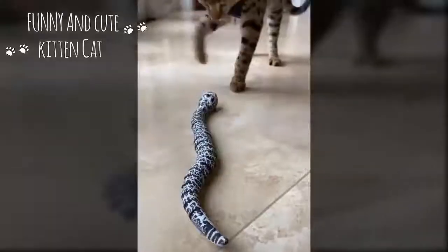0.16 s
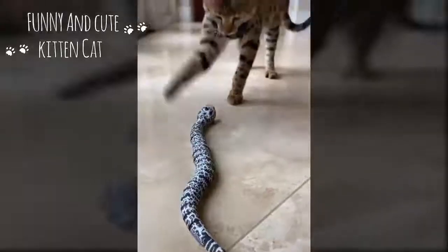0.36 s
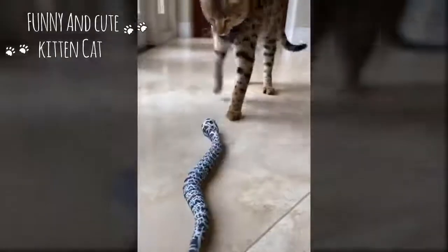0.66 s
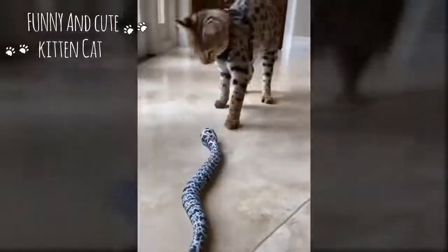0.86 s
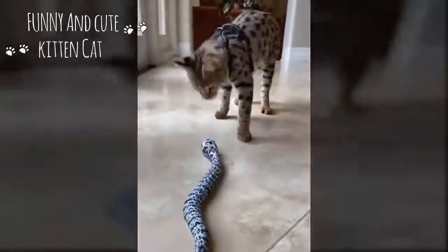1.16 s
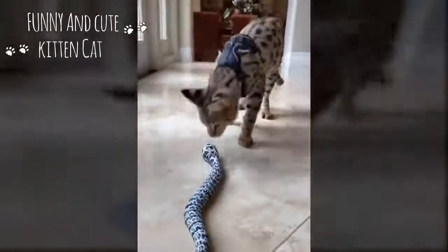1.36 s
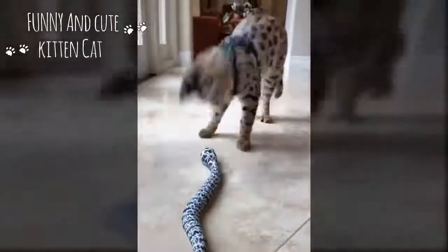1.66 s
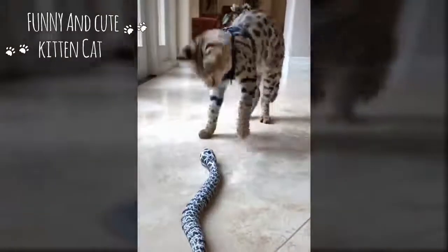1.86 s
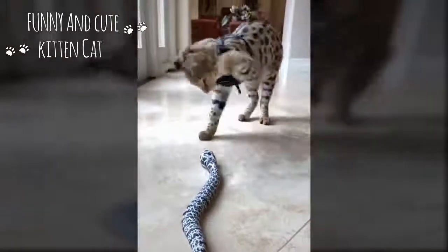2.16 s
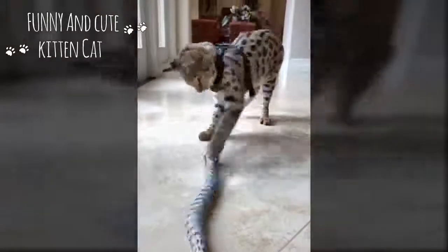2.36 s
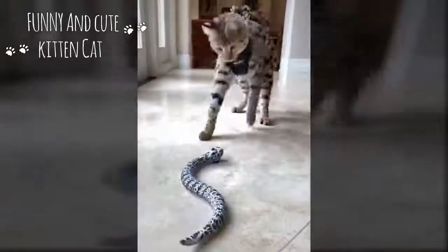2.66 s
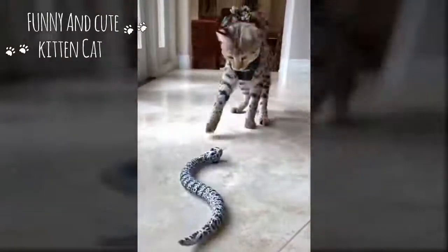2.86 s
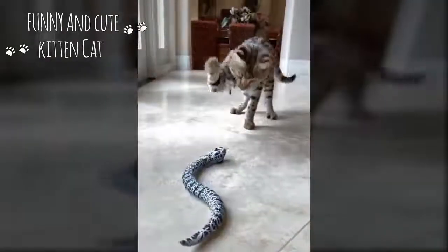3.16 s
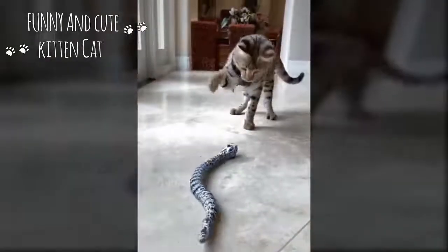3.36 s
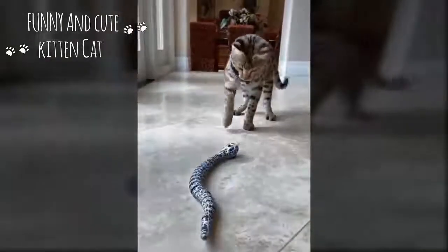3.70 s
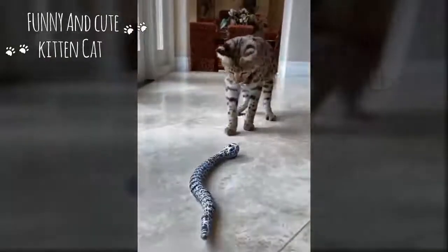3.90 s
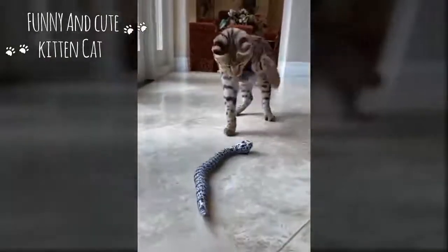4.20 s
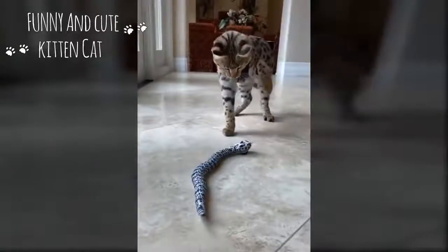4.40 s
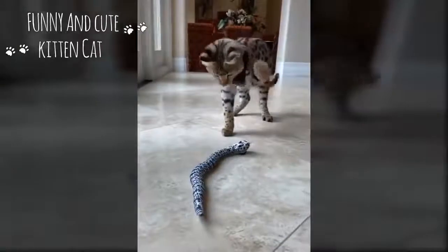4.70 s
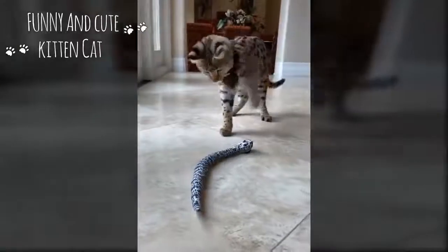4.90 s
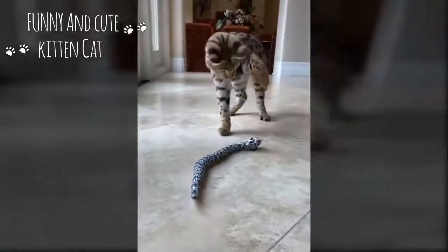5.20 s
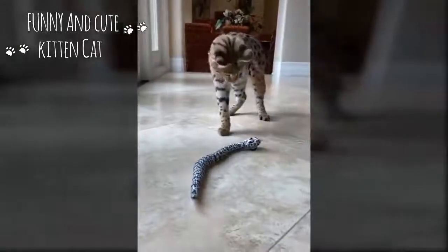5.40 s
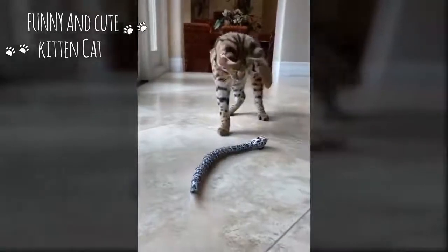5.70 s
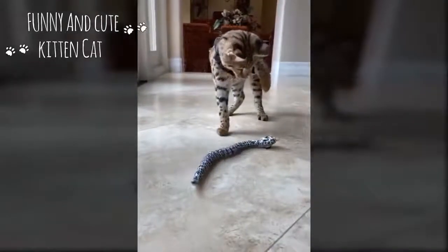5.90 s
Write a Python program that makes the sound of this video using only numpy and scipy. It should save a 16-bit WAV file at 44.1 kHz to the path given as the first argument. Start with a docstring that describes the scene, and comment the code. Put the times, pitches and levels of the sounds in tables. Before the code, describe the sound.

A faint hum runs under a live, stone-floored room. At about 0.4 seconds a toy snake whips sideways on the tile, a short hissing rasp with a soft low thump, followed by a remote button springing back. Light, close plastic taps and faint rubs are scattered from 0.6 to 1.8 seconds. A button clicks at 2.2, and a longer, louder rasp follows at 2.3, ending in a sharp plastic clack.

Then the toy makes four runs of about a quarter second each, at 3.0, 3.8, 4.7 and 5.5 seconds. In each, a small motor whirrs high while plastic segments rattle, knock and scrape. A crisp button click comes just before each run, and a release click during or after it. A brief scuff sounds at 5.1, and a soft rub with light taps near 6. The remote is close and almost dry, the snake farther off with room echo.

```python
"""Toy snake on a stone floor

A remote-controlled toy snake wriggles in front of a cat, far enough off the microphone to fill a live
room. Each move is a short hissing rasp: a small motor whirrs, plastic segments rattle and scrape on tile.
Close up and almost dry, the remote's buttons click down and spring back, among light taps on plastic.
The room hums faintly underneath."""
import sys
import numpy as np
from scipy import signal
from scipy.fft import rfft, irfft
from scipy.io import wavfile
from scipy.ndimage import map_coordinates

SR = 44100
rng = np.random.default_rng(int(sys.argv[2]) if len(sys.argv) > 2 else 0)


def log_audio(samples):
    """Write samples as a 16-bit WAV file to the path given in sys.argv[1]."""
    # one column per channel
    frames = np.atleast_2d(samples).T
    # limit to full scale, then quantise
    limited = np.clip(frames, -1, 1)
    pcm = np.round(limited * 32767).astype(np.int16)
    wavfile.write(sys.argv[1], SR, pcm)


N = 266805
TIME = np.arange(N) / SR
BRIEF = TIME[:2048]

# forward runs, levels relative: t/s, length/s, slack/s, rattle/dB, rattle fade/(dB/s), motor/dB, lurch/dB
RUNS = [(3.035, 0.29, 0.068, -33.5, 52, -35.5, -55), (3.813, 0.25, 0.053, -40.5, -9, -35.5, -35.5),
        (4.698, 0.268, 0.058, -34, 81, -36, -35), (5.467, 0.28, 0.12, -35, 56, -35, -40.5)]


def from_db(db):
    """Decibels to amplitude."""
    return 10 ** (np.asarray(db) / 20)


def rms_one(x):
    """Scales to unit rms."""
    return x / np.sqrt(np.mean(x ** 2) + 1e-20)


def peak_one(x):
    """Scales to unit peak."""
    return x / np.max(np.abs(x))


def energy_one(x):
    """Scales to unit energy."""
    return x / np.linalg.norm(x)


def at_hz(points, hz):
    """Reads a table on a log-frequency axis."""
    known_hz, values = np.transpose(points)
    return np.interp(np.log(np.maximum(hz, 1)), np.log(known_hz), values)


def response(spectrum, size=2048):
    """Minimum-phase impulse response of a spectrum."""
    cepstrum = irfft(np.log(from_db(at_hz(spectrum, np.fft.rfftfreq(size, 1 / SR)))))
    cepstrum[1:size // 2] *= 2
    cepstrum[size // 2 + 1:] = 0
    return energy_one(irfft(np.exp(rfft(cepstrum))))


def through(x, pulse):
    """Passes a signal through an impulse response."""
    return signal.fftconvolve(x, pulse)[:len(x)]


def filtered(x, kind, hz):
    """A gentle Butterworth filter."""
    return signal.sosfilt(signal.butter(2, hz, kind, fs=SR, output="sos"), x)


def ringing(modes):
    """Impulse response of parallel resonances."""
    return energy_one(sum(from_db(db) * width * np.exp(-np.pi * width * BRIEF)
                          * np.cos(2 * np.pi * hz * BRIEF) for hz, width, db in modes))


def add(track, s, sound):
    """Lays a sound into a track at s seconds."""
    start = round(s * SR)
    track[start:start + len(sound)] += sound[:N - start]


def envelope(start, length, attack_s, release_s):
    """Straight attack, hold, exponential release."""
    t = TIME - start
    return np.clip(t / attack_s, 0, 1) * np.exp(-np.maximum(t - length, 0) / release_s)


def crack(decay_s):
    """A contact that breaks up into ever weaker micro-impacts."""
    return rng.standard_normal(len(BRIEF)) * np.exp(-BRIEF / decay_s)


def rattle(per_s, spread_db, decay_s, scrape_db):
    """Random tiny collisions of uneven size over a smooth scrape."""
    sizes = from_db(spread_db * np.minimum(rng.exponential(1, N), 3))
    hits = rng.random(N) < per_s / SR
    power = signal.lfilter([1], [1, -np.exp(-2 / (decay_s * SR))], hits * sizes ** 2 + 1e-18)
    amplitude = np.sqrt(power / power.mean() + from_db(scrape_db) ** 2)
    return rms_one(amplitude * rng.standard_normal(N))


def room(x, wet_db, wall_cut_hz, first_echo_s=0.005, size=32768):
    """Direct sound plus a diffuse tail off stone and plaster; the treble dies first."""
    # reverberation time: f/Hz, t60/s
    t60 = [(200, 1), (2500, 0.63), (5000, 0.55), (9000, 0.46), (13000, 0.46)]
    t, tail = TIME[:size], 0
    edges = np.geomspace(100, 16000, num=40)
    hz = np.fft.rfftfreq(size, 1 / SR)
    dulled = rfft(rng.standard_normal(size)) / np.sqrt(1 + (hz / wall_cut_hz) ** 4)
    for low, high in zip(edges, edges[1:]):
        band = irfft(dulled * (hz >= low) * (hz < high))
        tail += band * np.exp(-np.log(1000) * t / at_hz(t60, np.sqrt(low * high)))
    return x + from_db(wet_db) * through(x, energy_one(tail * (t > first_echo_s)))


def room_tone(hum_hz=249.3):
    """Low room noise with a faint appliance hum."""
    # spectrum of the quiet room: f/Hz, level/dB
    air_colour = [(15, -31.5), (25, -28), (53, 3.5), (137, -6), (173, -9), (244, -11), (285, -11.5),
                  (333, -11.5), (658, -19), (731, -17), (975, -19.5), (1980, -22.5), (2370, -23.5),
                  (3250, -25.5), (13000, -39.5)]
    air = through(rng.standard_normal(N), response(air_colour, size=8192))
    hum = np.sqrt(2) * np.sin(2 * np.pi * hum_hz * TIME)
    return from_db(-63.5) * air + from_db(-76.5) * hum


def snake_flicks():
    """The body whips sideways: a dense rasp, with slams as the joints reach their stops."""
    # sideways flicks: t/s, length/s, relative level/dB
    flicks = [(0.375, 0.082, -38), (2.297, 0.16, -34.5)]
    # one spectrum a flick, as each leaves the body in another shape: f/Hz, level/dB
    colours = [
        [(180, -66), (300, -25), (564, -19.5), (620, -20), (1700, -15.5), (2450, -1), (3460, -4), (4240, -0.5),
         (4590, -7.5), (5820, -6), (6700, -16), (9190, -8), (10600, -24.5), (13000, -27)],
        [(180, -59), (300, -27.5), (891, -20.5), (979, -16.5), (1260, -21.5), (1620, -11), (1780, -12),
         (2520, 2.5), (3460, -4.5), (3740, -1), (4810, -4), (9480, -10.5), (10400, -19), (13000, -23)],
    ]
    # segments hitting their stops: t/s, relative peak/dB, hold/s
    slams = [(0.391, -22.5, 0.0043), (0.44, -19.5, 0.0084), (2.303, -19, 0.0094), (2.349, -23.5, 0.038),
             (2.4262, -9, 0.0022)]
    out = np.zeros(N)
    for (start, length, rasp_db), colour in zip(flicks, colours):
        grit = rattle(per_s=600, spread_db=3, decay_s=0.0009, scrape_db=1)
        force = from_db(rasp_db - 0.5) * envelope(start, length, attack_s=0.0052, release_s=0.035) * grit
        for s, peak_db, hold_s in slams:
            if start <= s < start + length:
                burst = np.exp(-np.maximum(BRIEF - hold_s, 0) / 0.008) * rng.standard_normal(len(BRIEF))
                burst = signal.lfilter([1, -0.3], [1], burst)  # a hard stop is brighter than the scrape
                add(force, s, from_db(peak_db + 5) * peak_one(burst))
        out += room(through(force, response(colour)), wet_db=-12.5, wall_cut_hz=17000)
    return out


def thumps():
    """The body lands on the floor, soft and low."""
    # landings: t/s, peak/dB
    landings = [(0.382, -44.5), (2.303, -39), (2.429, -46.5)]
    # the body's weight on the tiles: f/Hz, width/Hz, level/dB
    body_modes = [(115, 44, 3), (165, 33, -6.5), (337, 303, -18.5)]
    thump = peak_one(through(ringing(body_modes), np.hanning(64)))
    out = np.zeros(N)
    for s, peak_db in landings:
        add(out, s, from_db(peak_db) * thump)
    return out


def snap_dome(clicks, modes, gain_db, chatter_db, low_cut_hz):
    """A button's dome flips, chatters and rings the case; no two clicks ring quite alike."""
    out = np.zeros(N)
    for s, peak_db, dome_db in clicks:
        snap = from_db(chatter_db) * filtered(crack(decay_s=0.0025), "high", hz=3000)
        snap[0] += 1
        struck = [(hz, width, db + dome_db * (hz > 3000) + rng.normal(0, 1.2)) for hz, width, db in modes]
        add(out, s, from_db(peak_db + gain_db) * peak_one(through(snap, ringing(struck))))
    return filtered(out, "high", low_cut_hz)


def remote_buttons():
    """The buttons click down and spring back, with a different ring each way."""
    # clicks, down and up: t/s, relative peak/dB, dome against case/dB
    presses = [(2.194, -33, -8), (3.004, -18, -1), (3.716, -17.5, 1.1), (4.549, -21, -2),
               (5.307, -23, -3.5)]
    releases = [(0.466, -30.5, 8), (3.171, -26, -0.5), (4.054, -22, 12), (5.067, -23.5, 0),
                (5.635, -24.5, 0)]
    # resonances of dome and case, down and up: f/Hz, width/Hz, level/dB
    down_modes = [(740, 99, 9.5), (974, 94, 4), (1586, 200, 0), (1850, 160, 7), (2200, 34, -8.5),
                  (4495, 150, 13.5), (4300, 28, -2.5), (5590, 430, 6), (6200, 190, 6), (6360, 290, -7),
                  (7400, 410, -25.5), (8600, 600, -54)]
    up_modes = [(698, 78, 13), (928, 41, 2), (1420, 97, -3), (1756, 77, 3.5), (1920, 170, 6),
                (4330, 240, -8), (7000, 640, -32)]
    down = snap_dome(presses, down_modes, gain_db=5.5, chatter_db=-15, low_cut_hz=490)
    up = snap_dome(releases, up_modes, gain_db=7, chatter_db=-19, low_cut_hz=580)
    return down + up


def joint_knocks(jolt_db=-30.5):
    """Force of single joints knocking, and of the gears catching as each run starts."""
    # hardest knocks, in the runs and settling after a flick: t/s, relative level/dB
    knocks = [(0.5048, -26), (2.5336, -26.5), (3.1016, -19), (3.1142, -28), (3.1448, -21), (3.1784, -18),
              (3.2104, -24.5), (3.246, -18), (3.257, -18.5), (3.3027, -19.5), (3.3104, -23.5),
              (3.8741, -28.5), (3.92, -21), (4.0073, -20.5), (4.756, -18), (4.8234, -25), (5.6088, -19),
              (5.675, -26.5), (5.694, -23), (5.704, -20)]
    jolts = [(start, jolt_db) for start, *_ in RUNS]
    force = np.zeros(N)
    for s, db in jolts + list(knocks):
        add(force, s, from_db(db + 11.5) * energy_one(crack(decay_s=0.0027)))
    return force


def wander(x, depth_db, per_s):
    """As the body bends, narrow bands of its sound swell and fade on their own."""
    hz, t, cells = signal.stft(x, SR, nperseg=512)
    knots = rng.standard_normal((32, 128))
    grid = np.meshgrid(hz / 700, t * per_s, indexing="ij")
    gain = from_db(depth_db * map_coordinates(knots, grid, order=1, mode="mirror"))
    return signal.istft(cells * gain, SR, nperseg=512)[1][:N]


def taps(tick_width_hz=1400):
    """Each tap is a bright tick plus the hollow knock of a plastic case."""
    # light touches, peaks relative: t/s, tick/dB, tick f/Hz, knock/dB
    touches = [(0.625, -16, 5860, -36.5), (1.273, -20, 9160, -60), (1.31, -67, 9420, -64),
               (1.5135, -41.5, 7650, -54), (1.5319, -33, 5700, -51), (1.703, -22.5, 5700, -51),
               (1.7253, -48, 4360, -49), (1.732, -24, 5100, -52.5), (1.7423, -55, 4270, -53),
               (5.2596, -37, 7200, -71), (5.9454, -37.5, 4040, -52.5), (6.0012, -25.5, 6960, -56)]
    # resonances of the case: f/Hz, width/Hz, level/dB
    case_modes = [(755, 150, 6), (980, 270, 4.5), (1520, 520, 3), (1875, 200, -14), (3450, 400, -4)]
    out = np.zeros(N)
    for s, tick_db, hz, knock_db in touches:
        tick = through(crack(decay_s=0.0018), ringing([(hz, tick_width_hz, 0)]))
        add(out, s, from_db(tick_db - 1.5) * peak_one(filtered(tick, "high", hz=2500)))
        contact = from_db(-14) * crack(decay_s=0.0025)
        contact[0] += 1
        knock = filtered(through(contact, ringing(case_modes)), "band", hz=[520, 3500])
        add(out, s, from_db(knock_db + 11.5) * peak_one(knock))
    return out


def scuffs(relative_width=0.36):
    """Brief swells of friction noise, each in a broad resonance of its own."""
    # soft rubs between moves: t/s, length/s, f/Hz, level/dB
    rubs = [(1.024, 0.089, 2270, -69), (1.56, 0.105, 5530, -62), (1.657, 0.082, 7940, -55.5),
            (1.781, .17, 8600, -69.5), (5.079, 0.033, 6100, -42.5), (5.969, 0.084, 6300, -58)]
    out = np.zeros(N)
    for s, length, hz, db in rubs:
        noise = rms_one(through(rng.standard_normal(16384), ringing([(hz, hz * relative_width, 0)])))
        swell = np.hanning(int(length * SR))
        add(out, s, from_db(db) * swell * noise[:len(swell)])
    return out


def run_gains(take_up_s=0.027, lurch_s=0.017):
    """Rattle and motor swell as the slack runs out; the rattle fades or grows, then lurches at the stop."""
    chatter_gain, motor_gain = 0, 0
    for start, length, slack_s, rattle_db, fade_db_per_s, motor_db, lurch_db in RUNS:
        t = TIME - start
        drive = envelope(start, length, attack_s=0.0023, release_s=0.0079)
        unloaded = np.clip((slack_s - t) / take_up_s, 0, 1)
        faded_db = fade_db_per_s * np.clip(t - slack_s, 0, length)
        lurch = from_db(lurch_db) * np.exp(-np.abs(t - length) / lurch_s)
        chatter_gain += drive * from_db(rattle_db - 12.5 * unloaded - faded_db) + lurch
        motor_gain += drive * from_db(motor_db - 6 * unloaded)
    return chatter_gain, motor_gain


def segments(chatter_gain):
    """Floor scrape and knocking joints ring the hollow plastic segments."""
    # broad spectrum of the segments: f/Hz, level/dB
    colour = [(350, -73), (600, -24), (1110, -23.5), (1270, -24), (2380, 3.5), (2850, -3), (3640, -0.5),
              (3930, 2.5), (4410, 0.5), (5020, -1), (6240, -5.5), (7770, -5), (8610, -1.5), (12000, -36),
              (13000, -60)]
    # shell resonances standing out of it: f/Hz, width/Hz, level/dB
    shell_modes = [(2600, 160, -12), (3893, 140, -8), (5000, 410, -21), (4920, 210, -3), (8590, 140, 6.5)]
    grit = rattle(per_s=300, spread_db=3, decay_s=0.001, scrape_db=0)
    light_knocks = from_db(-2.5) * rattle(per_s=110, spread_db=2, decay_s=0.0012, scrape_db=-30)
    force = from_db(-3) * chatter_gain * (grit + light_knocks) + joint_knocks()
    broad = response(colour)
    shell = energy_one(broad + from_db(-15.5) * through(broad, ringing(shell_modes)))
    return wander(through(force, shell), depth_db=1, per_s=14)


def motor(gain):
    """The small motor whirrs: dense ticks through high resonances."""
    # motor resonances: f/Hz, width/Hz, level/dB
    motor_modes = [(9270, 400, 8), (9000, 450, -3), (9830, 144, 6.5), (11500, 1200, -28)]
    ticks = from_db(-9) * gain * rattle(per_s=1800, spread_db=11, decay_s=0.0003, scrape_db=-0.5)
    whirr = filtered(through(ticks, ringing(motor_modes)), "high", hz=5500)
    return wander(whirr, depth_db=2.5, per_s=14)


def scene():
    """One microphone: the remote close and almost dry, the snake out in the room."""
    near = room(remote_buttons() + taps(), wet_db=-27, wall_cut_hz=8900)
    rubs = room(scuffs(), wet_db=-7.5, wall_cut_hz=6000)
    flicks = snake_flicks()
    chatter_gain, motor_gain = run_gains()
    runs = room(segments(chatter_gain) + motor(motor_gain), wet_db=-8.5, wall_cut_hz=7300)
    return (flicks + thumps() + runs + rubs + near + room_tone())[None]


def record(dry):
    """A steep top cut at 13.1 kHz."""
    return signal.sosfilt(signal.ellip(10, 0.2, 70, 13100, fs=SR, output="sos"), dry)


dry = scene()
out = record(dry)
log_audio(out)
```